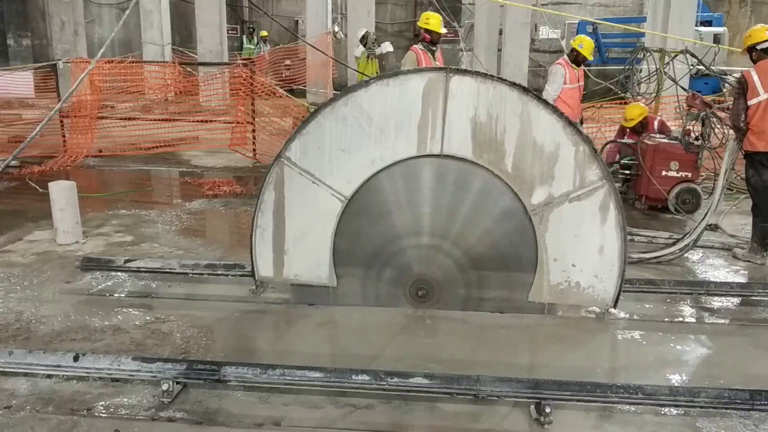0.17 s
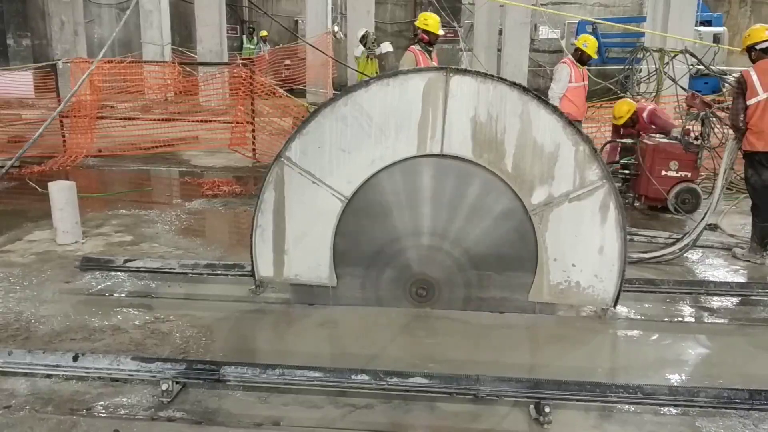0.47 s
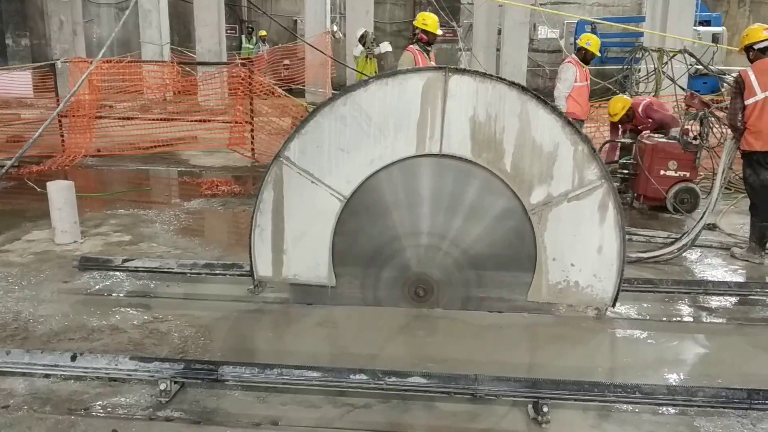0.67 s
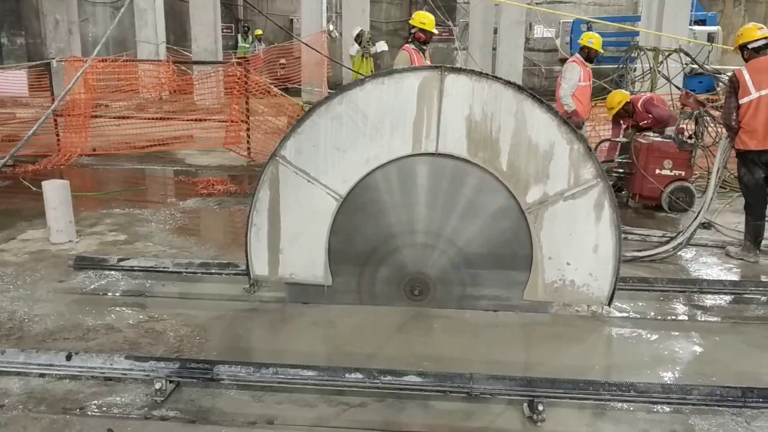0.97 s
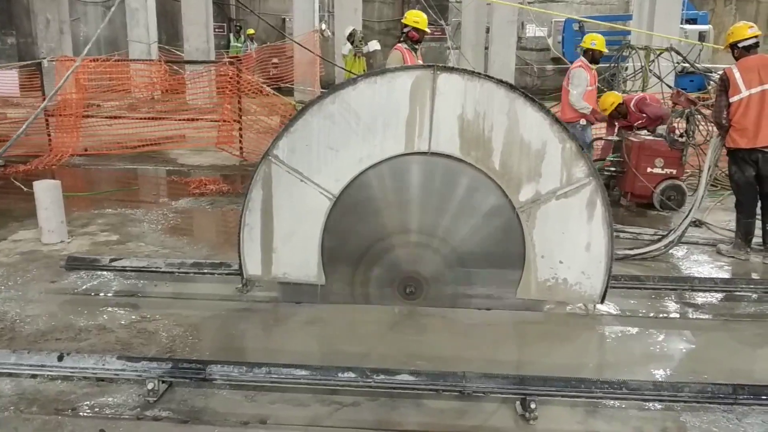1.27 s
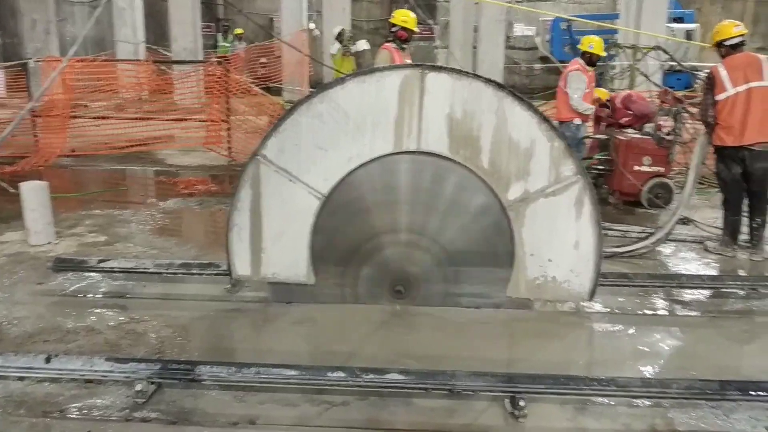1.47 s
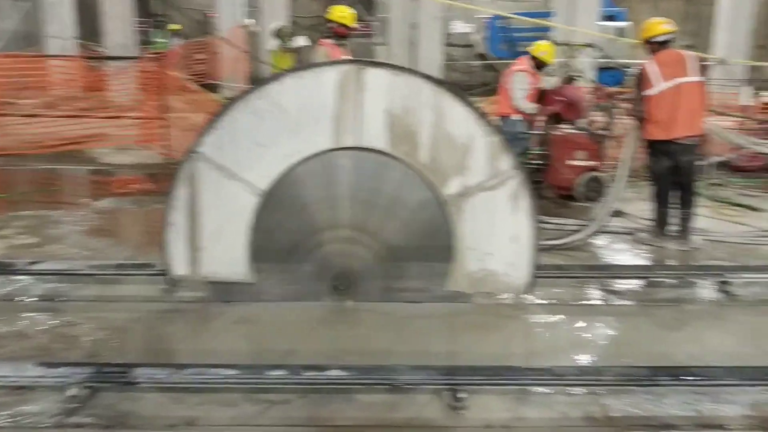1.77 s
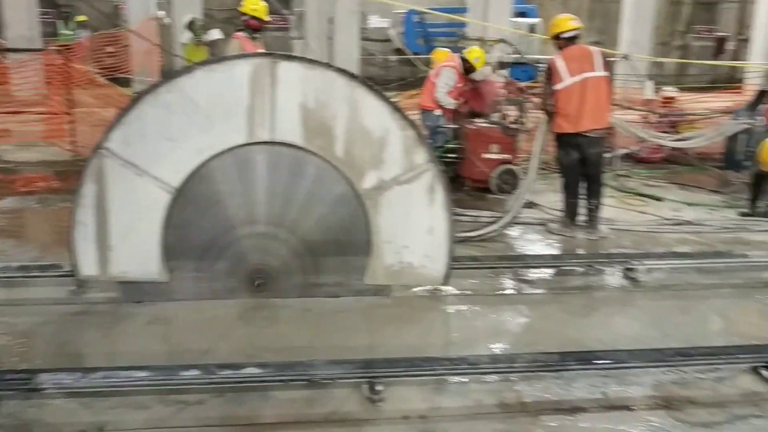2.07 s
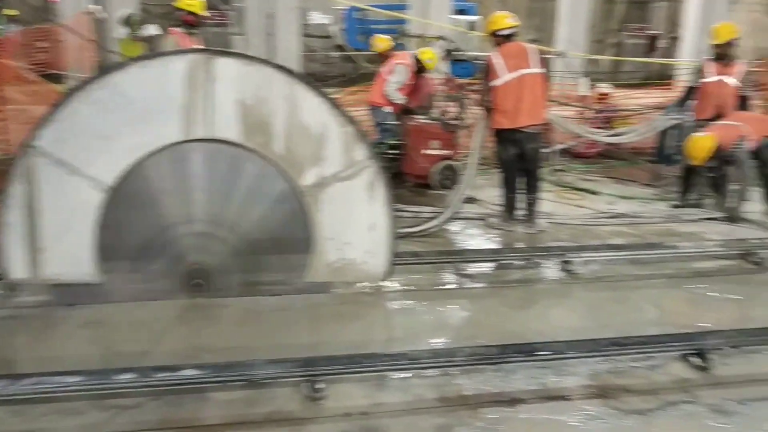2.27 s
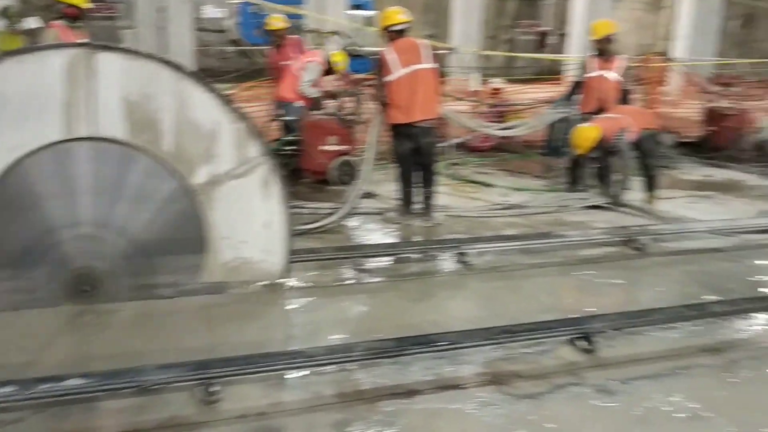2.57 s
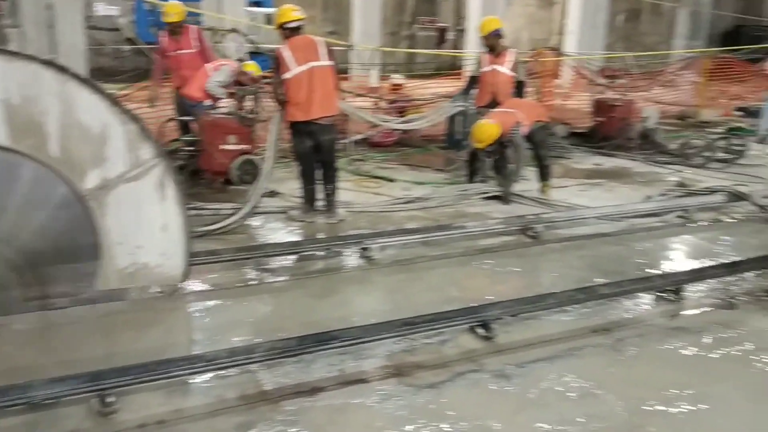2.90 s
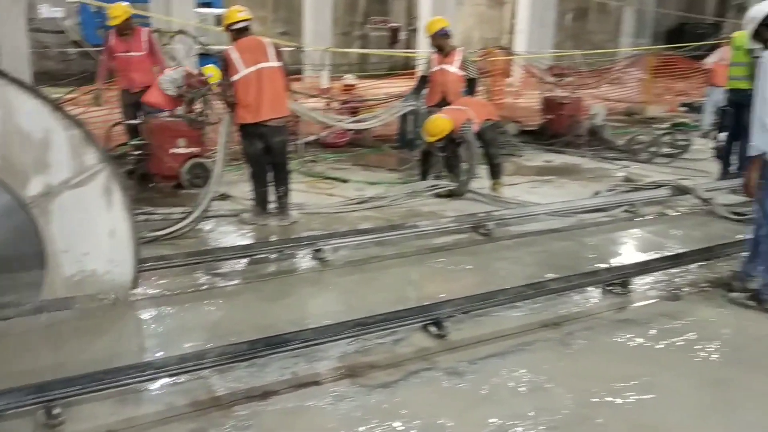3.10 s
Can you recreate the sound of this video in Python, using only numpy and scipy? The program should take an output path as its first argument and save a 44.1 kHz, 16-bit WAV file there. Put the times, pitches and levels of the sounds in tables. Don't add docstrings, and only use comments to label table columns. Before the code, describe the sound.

Loud concrete saw roaring and hissing under water spray, with a power unit humming behind it.

```python
import sys
import numpy as np
from scipy import signal
from scipy.fft import rfft, irfft, next_fast_len
from scipy.io import wavfile
from scipy.ndimage import uniform_filter1d, map_coordinates

SR = 44100
rng = np.random.default_rng(int(sys.argv[2]) if len(sys.argv) > 2 else 0)


def invert_db(level):
    return 10 ** (np.asarray(level, dtype=float) / 20)


def dump_mix(stems):
    frames = np.atleast_2d(stems).T
    limited = np.clip(frames, -1, 1)
    pcm = np.round(limited * 32767).astype(np.int16)
    wavfile.write(sys.argv[1], SR, pcm)


N = 142884
TOP_HZ = 15750


def saw():
    noise = grind() + rim_hiss() + spray()
    return invert_db(-9.5) * noise + invert_db(3) * disc() + shaft() + drive()


# (frequency [Hz], facing left port [dB], facing right port [dB],
# turned left port [dB], turned right port [dB])
GRIND_COLOUR = [(1950, -13, -14, -10.5, -12), (2300, -7.3, -9.8, -3.5, -5), (2620, -8.8, -9, -3, -4.6),
                (3150, -2.6, 0.1, -1.3, -0.8), (3900, -3.6, -3, -1.6, -1.5), (4750, -3.3, 0, -2.8, 0),
                (5500, -7, -7.3, -2.7, -2.3), (6800, -4.2, -3.8, 1.6, 0.8)]


def grind():
    band = between(GRIND_COLOUR[0][0], GRIND_COLOUR[-1][0])
    return rush(saw_colour(), band, 0.89, grain_rate=700, late_by=2, patchy_db=.8, grain_db=1.5)


# (frequency [Hz], facing left port [dB], facing right port [dB],
# turned left port [dB], turned right port [dB])
RIM_COLOUR = [(7300, -1.3, -0.7, 0.6, -1.6), (7750, 1.4, 2, 1.5, 0.6), (8400, 5.7, 2.5, 4, 0.8),
              (9200, 4, -1.4, 4.8, -0.2), (10000, 2.9, -1.8, 2.6, -0.5), (10800, 1.4, -2.3, 4.8, 0.5),
              (11050, -3.8, -5.4, 4.3, 0), (11350, -4.4, -6.6, 3, -0.5)]


def rim_hiss():
    band = between(GRIND_COLOUR[-1][0], RIM_COLOUR[-1][0])
    return rush(saw_colour(), band, 0.89, grain_rate=1500, late_by=1.2, patchy_db=.7, grain_db=1.2)


# (frequency [Hz], facing left port [dB], facing right port [dB],
# turned left port [dB], turned right port [dB])
SPRAY_COLOUR = [(11700.0, -2.6, -6.0, -0.5, -2.7), (12600.0, 0.4, -4.1, 2.2, -0.8),
                (13300.0, -1.4, -4.7, 2.2, -1.7), (13900.0, -4.5, -7.3, 4.7, -2.1),
                (14400.0, -4.6, -6.4, 4.1, -2.7), (15000.0, -9.5, -9.3, 2.6, -4.0),
                (15500.0, -5.2, -6.2, -0.5, -2.1), (15700.0, -5.1, -6.6, -3.4, -4.2)]


def spray():
    band = between(RIM_COLOUR[-1][0], TOP_HZ)
    return rush(saw_colour(), band, 0.89, grain_rate=2500, late_by=1, patchy_db=1.2, grain_db=1.6)


def saw_colour():
    return GRIND_COLOUR + RIM_COLOUR + SPRAY_COLOUR


# (frequency [Hz], level [dB])
DISC_MODES = [(7634, -41), (7780, -46), (7908, -40.5), (8085, -45), (8300, -44), (8395, -43), (8610, -45),
              (8781, -42), (10419, -44), (10703, -44), (14347, -45), (14600, -45)]


def disc():
    width_hz = 14

    def ringing(hz):
        response = 0
        for mode_hz, db in DISC_MODES:
            strength = invert_db(db) * np.sqrt(SR * width_hz / np.pi)
            response = response + strength / (hz - mode_hz + 1j * width_hz / 2) / 2
        return response

    grit = rng.standard_normal((2, N))
    return filtered(ports(grit, 0.71, patchy_db=3.5), ringing)


# (multiple [-], level [dB])
SHAFT_ORDERS = [(11, -53), (12, -54), (16, -52), (18, -50), (19, -45), (20, -48), (21, -49), (22, -51),
                (23, -52), (24, -53), (26, -51), (27, -53), (29, -52), (30, -51), (32, -54)]


def shaft():
    shaft_hz, thump_s, sweep_s_per_hz = 9.49, 1.11, .0004
    lines = [(order * shaft_hz, db, 0) for order, db in SHAFT_ORDERS]

    def start(hz):
        together = np.pi / 2 - 2 * np.pi * hz * thump_s
        return together - np.pi * sweep_s_per_hz * (hz - 180) ** 2

    return tones(lines, sway_db=1.5, drift=.3, start=start)


# (frequency [Hz], level [dB], lead of the left port [rad])
DRIVE_TONES = [(968.7, -48, 1.1), (1367.3, -47, .9), (1631, -51, 0)]


def drive():
    return tones(DRIVE_TONES, sway_db=3.0, drift=0.31)


# (frequency [Hz], level [dB], lead of the left port [rad])
UNIT_TONES = [(18.8, -57, .3), (37.7, -46, .3), (56.3, -51, .5), (75.1, -46, .2), (96.9, -53, .2),
              (119.8, -46.5, .2), (126.5, -50, .2), (264.2, -44.5, .2), (336.6, -42.5, -.2),
              (350.3, -53, 0), (365.1, -55, 0), (673.2, -51, .1)]


def power_unit():
    return tones(UNIT_TONES, sway_db=.9, drift=.18) + valve_whine()


# (frequency [Hz], level [dB], lead of the left port [rad])
WHINE_TONE = [(818, -39.8, -.1)]


def valve_whine():
    end_s, fade_s, rest_db = 1.08, .08, -11
    gate_db = rest_db / (1 + np.exp((end_s - np.arange(N) / SR) / fade_s))
    return invert_db(gate_db) * tones(WHINE_TONE, sway_db=.5, drift=.15)


# (frequency [Hz], level [dB])
ROAR_COLOUR = [(20, -2.5), (56, -6), (88, -6.5), (150, -9.5), (190, -2.5), (330, -5), (450, -6.5),
               (800, -5.5), (940, -3), (1050, -10.5), (1400, -4), (1950, -9.5), (2300, -7.5), (2900, -49),
               (4800, -120)]


def hall_roar():
    pan_db, turn_db = -0.9, -1.3
    left, right = pan_db / 2, -pan_db / 2
    balance = [(1, left, right, left + turn_db, right + turn_db)]
    roar = rush(balance, lambda hz: invert_db(along(ROAR_COLOUR, hz)), 0.43,
                grain_rate=200, late_by=2.1, patchy_db=0.67, grain_db=0.79)
    return invert_db(-29) * unit(roar)


def rush(colour, band, lags, grain_rate, late_by, patchy_db, grain_db):
    grain = wobble(grain_rate) + 0.36 * wobble(29.0) + 0.077 * wobble(6.43)
    grit = rng.standard_normal((2, N)) * invert_db(grain_db * grain)
    return filtered(ports(unit(grit), lags, patchy_db, colour, late_by), band)


def tones(lines, sway_db, drift, start=lambda hz: 0):
    t = np.arange(N) / SR
    total = 0
    for hz, db, lead in lines:
        level = np.sqrt(2) * invert_db(db + sway_db * wobble(5.82, order=1))
        sway = drift * wobble(4.15, order=1)
        port_lead = lead * np.array([[.5], [-.5]])
        total = total + level * np.sin(2 * np.pi * hz * t + start(hz) + sway + port_lead)
    return total


# (time [s], turn [0-1])
TURN_PATH = [
    (0, 0),
    (.9, 0),
    (1.5, 0.12),
    (1.9, 0.47),
    (2.3, 0.74),
    (2.6, 0.71),
    (2.9, 0.96),
    (3.3, 0.94),
]
# (frequency [Hz], likeness [0-1])
PORT_LIKENESS = [(40, 0.59), (270, 0.87), (500, 0.74), (800, 1), (1300, 0.5), (3000, 0.053), (8000, 0.043),
                 (15000, 0.35)]


def ports(pair, lags, patchy_db, colour=((1, 0, 0, 0, 0),), late_by=1):
    hz, t, z = signal.stft(pair, SR, nperseg=512)
    patches = uniform_filter1d(rng.standard_normal(z.shape[1:]), size=5, axis=0)
    patches = uniform_filter1d(patches, size=14, axis=1)
    turn = np.clip(curve(TURN_PATH, t), 0, 2)
    lag_s = 0.000391 + .0001 * turn
    late = np.exp(-1j * np.pi * lags * np.outer(hz, lag_s))
    angle = np.arccos(np.clip(along(PORT_LIKENESS, hz), -1, 1))[:, None] / 2
    mid, side = z[0] * np.cos(angle), z[1] * np.sin(angle)
    f, *columns = np.transpose(colour)
    db = np.array([np.interp(hz, f, column) for column in columns])[..., None]
    facing, turned = db[:2], db[2:]
    colour_db = facing + (turned - facing) * turn ** late_by
    shade = invert_db(colour_db + patchy_db * unit(patches) + floor_echo_db(hz, t))
    both = np.array([(mid + side) * late, (mid - side) / late])
    return signal.istft(both * shade, SR, nperseg=512)[1][:, :N]


# (start [s], end [s], first frequency [Hz], last frequency [Hz],
# width [Hz], level [dB])
FLOOR_ECHOES = [
    (1.6, 2.3, 5350, 5450, 220, -4.5),
    (2.28, 2.72, 4030, 3900, 110, -10),
    (2.92, 3.3, 4350, 4250, 120, -6),
    (2.35, 2.95, 6700, 6800, 130, -3),
    (1.5, 1.9, 11300, 11400, 170, -1),
    (2.3, 3.05, 11350, 11950, 130, -2.5),
    (1.98, 2.28, 3050, 2950, 90, -5),
    (2.62, 2.82, 1980, 1980, 60, -8),
    (.1, .55, 6200, 6200, 900, 1.5),
    (.1, .5, 11300, 11300, 300, 2.5),
]


def floor_echo_db(hz, t):
    fade_s = .04
    total = 0
    for begin, end, first_hz, last_hz, width, db in FLOOR_ECHOES:
        centre = np.interp(t, [begin, end], [first_hz, last_hz])
        shape = np.exp(-((hz[:, None] - centre) / width) ** 2)
        rise, fall = 1 + np.exp((begin - t) / fade_s), 1 + np.exp((t - end) / fade_s)
        total = total + db * shape / rise / fall
    return total


# (frequency [Hz], level [dB])
DROPOUT_LEVEL = [(2400, -4), (4900, -4.4), (5500, -3.1), (7200, -3.1), (8000, -4), (10200, -3.3),
                 (11600, -2.4), (15500, -2)]


def weak_bands_silenced(x):
    hz, t, z = signal.stft(x, SR, nperseg=2048)
    power = np.sum(np.abs(z) ** 2, axis=0) + 1e-16
    near = uniform_filter1d(uniform_filter1d(power, size=3, axis=0), size=3, axis=1)
    wide = uniform_filter1d(uniform_filter1d(power, size=110, axis=0), size=4, axis=1)
    above_db = 10 * np.log10(np.abs(near / wide)) - along(DROPOUT_LEVEL, hz)[:, None]
    margin = np.clip(above_db / .3, -30, 30)
    keep = np.where(hz[:, None] > 2400, 1 / (1 + np.exp(-margin)), 1)
    return signal.istft(z * keep, SR, nperseg=2048)[1][:, :N]


def unit(x):
    return x / np.sqrt(np.mean(np.abs(x) ** 2) + 1e-20)


def along(points, hz):
    f, v = np.transpose(points)
    return np.interp(np.log(hz + 1), np.log(f + 1), v)


def curve(rows, t):
    return np.interp(t, *np.transpose(rows))


def wobble(rate, order=3):
    knots = rng.standard_normal(int(N * rate / SR) + 4)
    return map_coordinates(knots, [np.arange(N) * rate / SR], order=order)


def between(low, high):
    return lambda hz: (hz >= low) & (hz < high)


def filtered(x, response):
    m = next_fast_len(N + 8192)
    return irfft(rfft(x, m) * response(np.fft.rfftfreq(m, 1 / SR)), m)[..., :N]


def scene():
    return saw() + power_unit() + hall_roar()


def low_pass(x):
    return signal.sosfilt(signal.butter(12, 15900, fs=SR, output="sos"), x)


# (time [s], gain [0-1])
FADE_IN = [
    (.1045, 0.07),
    (.1065, 0.04),
    (.13, 0.26),
    (.16, 0.33),
    (.25, 0.62),
    (.36, 0.92),
    (.5, 1),
    (3.3, 0.98),
]


def record(dry):
    ceiling, knee = 0.95, 5
    slow = filtered(dry[0] ** 2, lambda hz: hz < 60)
    offset = -0.013 + 0.015 * wobble(6.4) - 0.039 * (slow - slow.mean())
    limited = dry / (1 + np.abs(dry / ceiling) ** knee) ** (1 / knee)
    x = limited + offset * np.array([[1], [0]])
    fade = curve(FADE_IN, np.arange(N) / SR) * (np.arange(N) > FADE_IN[0][0] * SR)
    mix = filtered(weak_bands_silenced(x), lambda hz: hz < TOP_HZ) * fade
    return low_pass(mix)


dry = scene()
out = record(dry)
dump_mix(out)
```